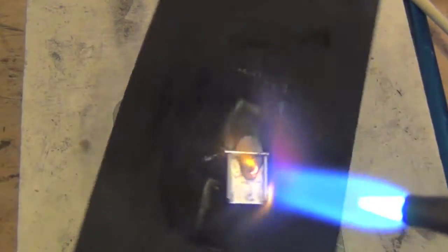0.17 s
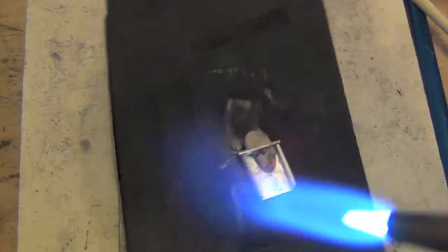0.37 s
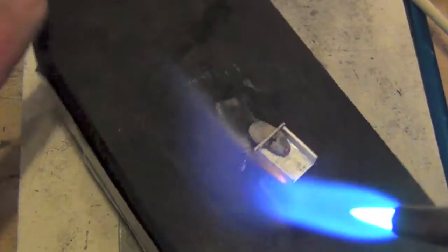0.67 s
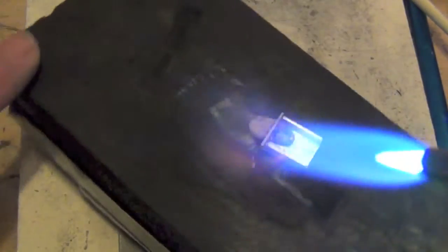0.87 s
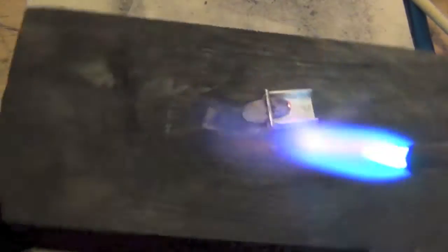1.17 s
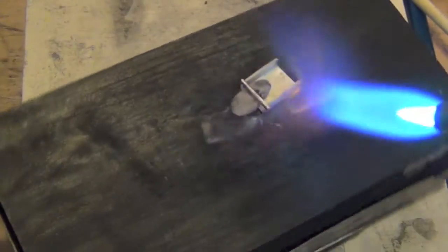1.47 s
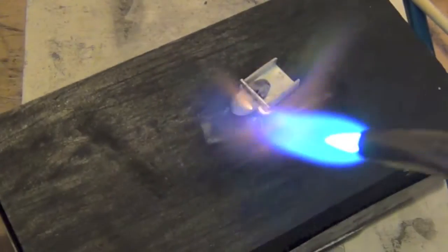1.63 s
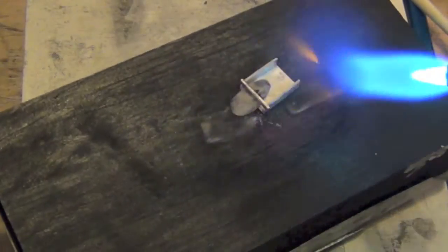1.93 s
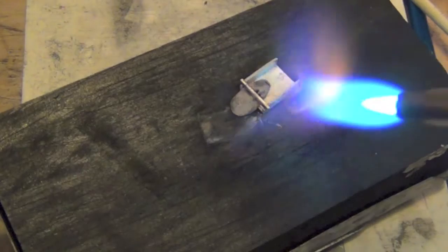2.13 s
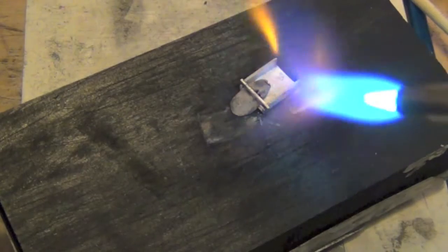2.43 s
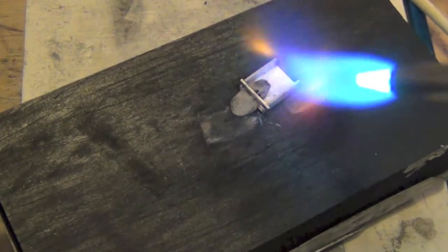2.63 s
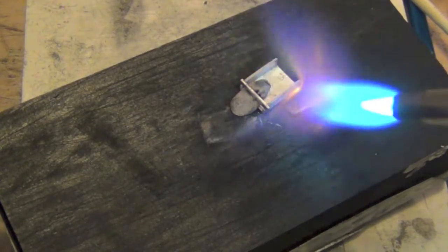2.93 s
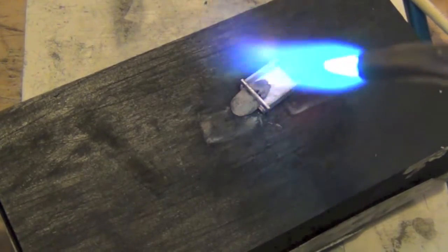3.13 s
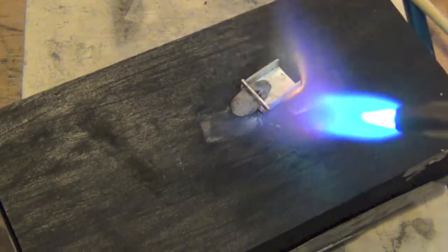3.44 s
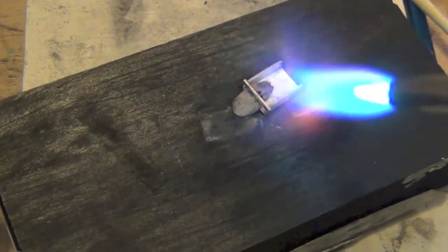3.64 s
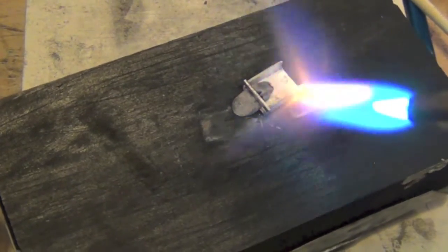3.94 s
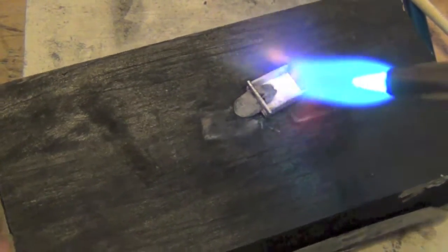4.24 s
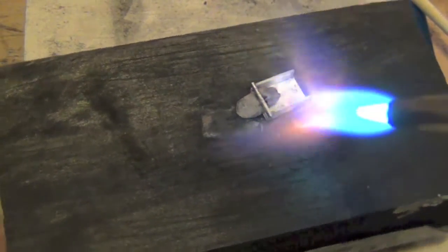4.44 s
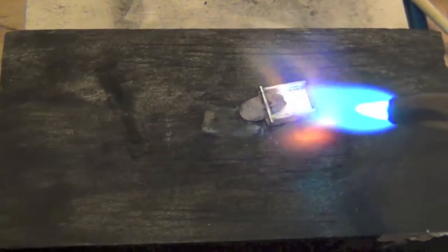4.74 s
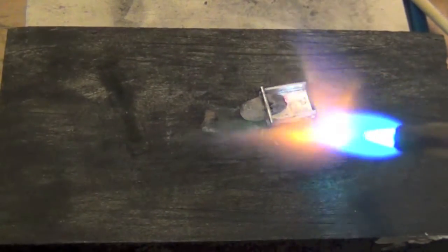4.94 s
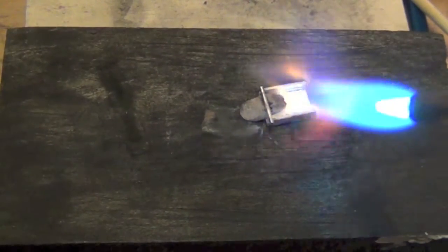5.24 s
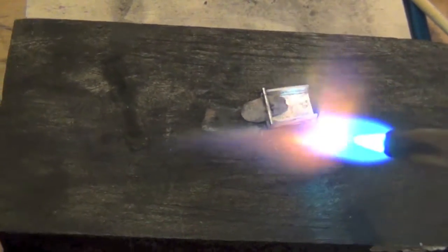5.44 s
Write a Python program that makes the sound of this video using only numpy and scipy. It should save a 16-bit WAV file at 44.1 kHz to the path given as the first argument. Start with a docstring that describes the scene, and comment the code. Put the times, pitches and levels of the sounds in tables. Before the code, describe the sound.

A small gas torch roars softly and hisses, spitting fine crackles, its tone sweeping as the flame moves over a block in a quiet workshop.

```python
"""A small gas torch sweeps over a soldering block in a quiet humming workshop.
Noise bursts roar and spit throughout, the nozzle hisses, microphones add self-noise.
At first the sweeps are small and the dead spots shallow; these reach full depth by 1.7 s.
From about 2 s wide sweeps make block and bench echo lags swing, so the combing glides;
single strong bursts flare up to the end, as the hum's low and high tones fade."""
import sys
import numpy as np
from scipy import signal
from scipy.fft import rfft, irfft, next_fast_len
from scipy.io import wavfile
from scipy.ndimage import uniform_filter1d, map_coordinates

SR = 44100
rng = np.random.default_rng(int(sys.argv[2]) if len(sys.argv) > 2 else 0)


def undo_db(level):
    """Turn decibels back into plain size, where 20 dB means ten times bigger."""
    steps = np.asarray(level, float) / 20
    return 10 ** steps


def store_wav(level_fs):
    """Save 16-bit WAV to argv[1]."""
    pcm = np.round(np.clip(np.atleast_2d(level_fs), -1, 1) * 32767)
    wavfile.write(sys.argv[1], SR, pcm.T.astype(np.int16))


N = 246959

# Turning points of the hand: t/s, block echo lag/ms
HAND_TURNS = [(0, 0.2), (.2, 0.17), (.5, 0.16), (.8, 0.17), (1, 0.17), (1.25, 0.16), (1.55, 0.17),
              (2.0, 0.12), (2.4, 0.16), (2.58, 0.093), (2.8, 0.2), (3.03, 0.078), (3.28, 0.2),
              (3.57, 0.092), (3.85, 0.19), (4.09, 0.11), (4.34, 0.16), (4.62, 0.082), (4.82, 0.13),
              (5.0, 0.095), (5.26, 0.16), (5.5, 0.094)]
# Narrow whistles and dead spots: f/Hz, width/Hz, boost/dB
NARROW_MODES = [(4300, 320, 12), (5330, 450, 10.5), (7310, 230, 8.5), (8780, 380, -18), (9450, 310, 12),
                (11540, 330, 11.5), (12800, 300, 7), (13700, 320, 11), (14200, 400, -8), (15000, 280, 11)]


def unit(x):
    """Scale to rms 1."""
    return x / np.sqrt(np.mean(x ** 2) + 1e-20)


def along(points, hz):
    """Interpolate (f/Hz, value) points on a log frequency axis."""
    f, v = np.transpose(points)
    return np.interp(np.log(hz + 1), np.log(f + 1), v)


def curves(rows):
    """One value per sample for each column after t/s."""
    s, *cols = np.transpose(rows)
    return [np.interp(np.arange(N) / SR, s, c) for c in cols]


def wobble(knots_per_s):
    """Smooth random curve: spline through normal draws."""
    return map_coordinates(rng.standard_normal(N // 8), [np.arange(N) * knots_per_s / SR])


def filtered(x, db_at):
    """Causal minimum-phase filter of gain db_at(f/Hz), by folding the cepstrum."""
    m = 2 * next_fast_len(N // 2 + 4096)
    log_gain = np.log(undo_db(db_at(np.fft.rfftfreq(m, 1 / SR))))
    cepstrum = irfft(log_gain, m)
    cepstrum[..., 1:m // 2] *= 2
    cepstrum[..., m // 2 + 1:] = 0
    response = np.exp(rfft(cepstrum))
    return irfft(rfft(x, m) * response, m)[..., :N]


def coloured(x, spectrum):
    """Filter x by (f/Hz, gain/dB) points."""
    return filtered(x, lambda hz: along(spectrum, hz))


def rings(modes, hz):
    """Summed boost/dB of (f/Hz, width/Hz, boost/dB) resonances."""
    return sum(db / (1 + (2 * (hz - c) / w) ** 2) for c, w, db in modes)


def swings(turns):
    """Hand motion: at rest at each turning point, fastest halfway (half-cosine)."""
    s, v = np.transpose(turns)
    place = np.interp(np.arange(N) / SR, s, np.arange(len(s)))
    whole = np.floor(place)
    eased = whole + .5 - .5 * np.cos(np.pi * (place - whole))
    return np.interp(eased, np.arange(len(s)), v)


def capsules():
    """Self-noise: independent coloured hiss in each microphone."""
    # Spectrum: f/Hz, relative level/dB
    self_noise = [(2000, -14), (4000, -10.5), (8000, 9.5), (10000, 2), (15000, -20)]
    return undo_db(-72.5) * unit(coloured(rng.standard_normal((2, N)), self_noise))


def workshop():
    """Low rumble, almost alike at both microphones, under unsteady mains and fan tones."""
    # Rumble: f/Hz, relative level/dB
    rumble = [(12, 2), (22, -3), (33, -11.5), (43, -5), (52, -15), (80, -20.5), (100, -14), (135, -18),
              (175, -13), (215, -12), (300, -13), (500, -12), (700, -22.5), (1100, -120)]
    # Hum tones, low to high: f/Hz
    hum_hz = (57.6, 121.7, 191.2)
    # Mean tone levels: t/s, low/dB, middle/dB, high/dB
    hum_levels = [(0, -87, -84, -77), (1.1, -77, -81, -74.5), (1.6, -73, -76, -75.5),
                  (4.1, -73, -77, -73.5), (4.8, -75, -74.5, -86), (5.6, -89, -76, -82)]
    waver_db = 2
    mid, side = coloured(rng.standard_normal((2, N)), rumble)
    side = coloured(side, [(30, -65), (125, -16.5), (400, -14.5)])
    t = np.arange(N) / SR
    hum = 0
    for hz, db in zip(hum_hz, curves(hum_levels)):
        level = undo_db(db + waver_db * wobble(3.6))
        phase = 2 * np.pi * hz * t + (hz / 130) ** 2 * wobble(6)
        hum = hum + level * np.sin(phase)
    return undo_db(-63.5) / np.std(mid) * np.array([mid + side, mid - side]) + hum


def walls(x):
    """Reverberation by decaying noise; a fresh random tail every 1/4 s keeps it free of fixed ripple."""
    # Decay: f/Hz, t60/s
    decay = [(300, 0.32), (2000, 0.38), (10000, 0.11)]
    wet, step = np.zeros((2, N + SR)), SR // 4
    for start in range(0, N, step):
        hz, t, z = signal.stft(rng.standard_normal((2, step)), SR, nperseg=256)
        decay_db = -60 * t / along(decay, hz)[:, None]
        tail = signal.istft(z * undo_db(decay_db), SR, nperseg=256)[1]
        tail = tail / np.linalg.norm(tail[0])
        part = signal.fftconvolve(x[None, start:start + step], tail, axes=1)
        wet[:, start:start + part.shape[1]] += part
    return wet[:, :N]


def block(x, share, bench_swing, spread_ms):
    """Direct sound plus block and later bench echoes; lags differ slightly between microphones."""
    # Bench path, changing throughout: t/s, echo share, lag before hand swing/ms
    bench = [(0, 0.095, 0.14), (.7, 0.1, 0.16), (1.7, 0.046, 0.11), (1.95, 0.1, 0.28), (4.3, 0.11, 0.27),
             (5.6, 0.15, 0.23)]
    lag_ms = swings(HAND_TURNS)
    bench_share, bench_ms = curves(bench)
    bench_lag_ms = bench_ms + bench_swing * lag_ms

    def late(ms):
        """x delayed by a varying fractional lag."""
        return map_coordinates(x, [np.arange(N) - ms * SR / 1000], order=5)

    return np.array([x + share * late(lag_ms + ms) + bench_share * late(bench_lag_ms + ms)
                     for ms in (-spread_ms, spread_ms)])


def shaded(x):
    """Dead spots glide as the flame passes behind the metal piece; shallow at first."""
    # Flame in front of the piece, at full depth: f/Hz, width/Hz, boost/dB
    in_front = [(3550, 650, -9), (6800, 500, -10), (12200, 600, -1)]
    # Flame behind the piece, at full depth: f/Hz, width/Hz, boost/dB
    in_shade = [(2900, 650, -12), (8200, 550, -7), (12200, 600, -5)]
    shade_from_ms, shade_full_ms = 0.099, 0.21  # block echo lags
    hz, t, z = signal.stft(x, SR, nperseg=256)
    lag_ms = np.interp(t, np.arange(N) / SR, swings(HAND_TURNS))
    behind = np.clip((lag_ms - shade_from_ms) / (shade_full_ms - shade_from_ms), 0, 1)
    spots = np.multiply.outer(in_front, 1 - behind) + np.multiply.outer(in_shade, behind)
    depth = np.interp(t, (1.1, 1.7), (.45, 1))  # t/s, share of full depth
    return signal.istft(z * undo_db(depth * rings(spots, hz[:, None])), nperseg=256)[1][:N]


def nozzle():
    """Gas jet: hiss with faint whistles; its bands waver slowly at random."""
    # Hiss: f/Hz, relative level/dB
    hiss = [(2000, -10), (4000, -6), (7000, 2.5), (8800, -6), (10500, 4.5), (12200, -2), (14200, -2.5),
            (15600, -4.5)]
    gas = filtered(rng.standard_normal(N), lambda hz: along(hiss, hz) + rings(NARROW_MODES, hz))
    hz, t, z = signal.stft(gas, SR, nperseg=256)
    field = uniform_filter1d(rng.standard_normal(z.shape), size=4, axis=0)
    field = uniform_filter1d(field, size=60, axis=1)
    return undo_db(-59.0) * unit(signal.istft(z * undo_db(2.1 * unit(field)), nperseg=256)[1][:N])


def patchy(depth_db, eddies):
    """Turbulent noise: bands flutter quickly, partly on their own, partly with the eddies."""
    hz, t, z = signal.stft(rng.standard_normal(N), SR, nperseg=128)
    field = uniform_filter1d(rng.standard_normal(z.shape), size=2, axis=0)
    field = uniform_filter1d(field, size=5, axis=1)
    flutter_db = depth_db * np.tanh(0.39 * unit(field))
    return unit(eddies * signal.istft(z * undo_db(flutter_db), nperseg=128)[1][:N])


def bursts():
    """Envelope of the strong bursts: each flares at once, holds and dies quickly."""
    # Strongest bursts of burning: t/s, level over the even-flame reference/dB, length/ms
    strong_bursts = [(0.1435, 9.2, 4.2), (0.1678, 10.6, 7.2), (0.2428, 8.3, 7.1), (0.2667, 8.9, 5.2),
                     (0.285, 8.6, 3.8), (0.3083, 8.5, 8.0), (0.3523, 8.7, 4.4), (0.3653, 8.5, 5.2),
                     (0.4018, 12.2, 4.7), (0.4307, 10.1, 5.7), (0.6367, 8.6, 12.0), (0.6578, 8.6, 4.4),
                     (0.769, 8.3, 4.5), (0.8576, 8.4, 8.2), (1.0175, 9.5, 12.0), (1.1096, 8.7, 4.9),
                     (1.2332, 10.1, 8.9), (1.2761, 8.4, 3.8), (1.407, 9.0, 9.3), (1.4768, 8.4, 4.5),
                     (1.6222, 8.3, 6.3), (1.6711, 8.3, 8.5), (1.7244, 8.9, 4.4), (1.7418, 9.5, 6.6),
                     (1.7685, 9.0, 5.5), (1.8552, 8.5, 4), (2.3075, 8.5, 5), (2.5265, 8.3, 5),
                     (2.6545, 8.6, 7.4), (2.7518, 9.2, 8.9), (2.7714, 10.2, 10.9), (3.0534, 8.6, 8.8),
                     (3.1289, 9.5, 9.0), (3.1479, 8.8, 9.3), (3.1952, 8.4, 8.5), (3.2145, 8.3, 4.5),
                     (3.2783, 10.3, 12.0), (3.301, 10.8, 6.4), (3.3137, 9.2, 4.6), (3.5972, 8.8, 4.6),
                     (3.9015, 8, 5), (4.2686, 8.4, 12.0), (4.355, 8, 6), (4.9529, 8.7, 4.9),
                     (4.973, 8.9, 6.2), (5.1304, 9.0, 8.8), (5.2902, 9.8, 4.8), (5.3085, 8.4, 3.2),
                     (5.3296, 10.9, 5.9), (5.4814, 8.6, 5.3)]
    out = np.zeros(N)
    age_ms = np.arange(-SR // 50, SR // 50) * 1000 / SR
    steepness = np.where(age_ms < 0, 6, 2.5)
    for s, db, ms in strong_bursts:
        shape = np.exp(-np.abs(age_ms / (0.44 * ms)) ** steepness)
        out[round(s * SR) - SR // 50:][:len(age_ms)] += undo_db(db) * shape
    return out


def flame():
    """Gas eddies burn in bursts that both ruffle the roar and set off the spits."""
    # Spitting before trim and eddies: t/s, level/dB
    spitting = [(0, -57), (.36, -52), (.56, -55.5), (1.36, -55.5), (1.42, -52), (1.52, -57), (1.72, -53.5),
                (2.34, -55.5), (2.42, -52), (2.55, -54), (3.09, -53.5), (4.04, -53.5), (4.13, -59),
                (4.2, -52.5), (5.07, -54), (5.15, -52), (5.6, -54.5)]
    # Roar and spit colours: f/Hz, relative level/dB
    roar_colour = [(150, -25), (400, -20.5), (520, -14.5), (620, -6), (860, -3), (1000, -2), (1500, 3),
                   (1700, 1), (2000, -3.5), (2500, -5.5), (3500, -8), (4500, -18), (7000, -37.5)]
    spit_colour = [(500, -17), (1500, -2.5), (2500, 9.5), (4000, 2), (4800, -1), (6200, 0), (6800, -2.5),
                   (8500, -3.5), (10500, -3), (12200, -9.5), (15500, -16.5)]
    # Brightness of strong bursts over even spitting: f/Hz, gain/dB
    flare_tilt = [(5000, -0.5), (10000, 1.5)]
    # Resonances around the flame: f/Hz, width/Hz, boost/dB
    throat = [(847, 37, 3), (1403, 110, 2.5), (1670, 146, 2), (1900, 370, 2), (2263, 196, 3)]
    even_db, burst_roar, modes_share = -56, 0.18, 0.21
    core_hz, core_width_hz, core_db = 1546, 294, -57.5  # hollow ring of the burner mouth

    spit_db, = curves(spitting)
    swirl = .3 * wobble(40) + .6 * wobble(90) + .9 * wobble(250)
    eddies = np.tanh(swirl - uniform_filter1d(swirl, size=SR // 9))  # bounded, no slow gusts
    strong = bursts()

    lift = np.maximum(undo_db(2.4 * eddies), 1 + burst_roar * strong)
    lull = undo_db(2.0 * np.minimum(eddies, 0))
    roar = patchy(6.4, lift * lull) * undo_db(-50)

    grit = unit(undo_db(9.3 * np.tanh(2.8 * wobble(700))) * rng.standard_normal(N))
    spit_gate = unit(undo_db(3.4 * eddies + 5 * np.maximum(eddies, 0) ** 3))
    sparks = grit * spit_gate * undo_db(spit_db + 0.28) / (1 + strong)  # strong bursts displace even spits
    flares = undo_db(even_db) * strong * unit(0.56 * grit + rng.standard_normal(N))
    sparks = sparks + coloured(flares, flare_tilt)

    white = rng.standard_normal(N)  # reference for unit-gain colours
    both = sum(coloured(x, colour) / np.std(coloured(white, colour))
               for x, colour in ((roar, roar_colour), (sparks, spit_colour)))
    body = filtered(both, lambda hz: rings(throat, hz) + modes_share * rings(NARROW_MODES, hz))
    core = unit(filtered(rng.standard_normal(N),
                         lambda hz: -20 * np.log10(1 + (2 * (hz - core_hz) / core_width_hz) ** 2)))
    return body + undo_db(core_db + 3.4 * eddies) * core


def scene():
    """Torch over the block, in the workshop."""
    # Torch drifts across the microphones: t/s, left over right/dB
    drift = [(0, -2), (.8, -2), (1.8, -2), (5.6, -0.2)]
    wall_colour = [(300, -12.0), (900, -26), (1500, -30.5), (2500, -29), (5000, -23.5),
                   (8500, -3.5), (11000, -26), (12700, -14), (15000, -16)]  # f/Hz, gain/dB
    fire, jet = shaded(flame()), shaded(nozzle())
    wet = coloured(walls(fire + jet), wall_colour)
    near = block(fire + 0.29 * jet, share=0.26, bench_swing=0.86, spread_ms=0.0036)
    near = near + 0.53 * jet  # part of the hiss misses the block
    pan = undo_db(np.outer([.5, -.5], curves(drift)[0]))
    return pan * near + wet + workshop() + capsules()


def low_pass(x):
    """Removes everything above the highest recorded frequency."""
    return signal.sosfilt(signal.butter(12, 16460, fs=SR, output="sos"), x)


def record(dry):
    """Microphone pair: left/right balance varies with frequency; 60 dB cut above the band limit."""
    # Balance: f/Hz, left over right/dB
    lean = [(90, 0), (300, -0.2), (2400, 1.24), (4400, -1.5), (8000, -1.5), (13000, 0.5)]
    top_hz = 15820
    mix = filtered(dry, lambda hz: np.outer([.5, -.5], along(lean, hz)) - 60 * (hz > top_hz))
    return low_pass(mix)


dry = scene()
out = record(dry)
store_wav(out)
```